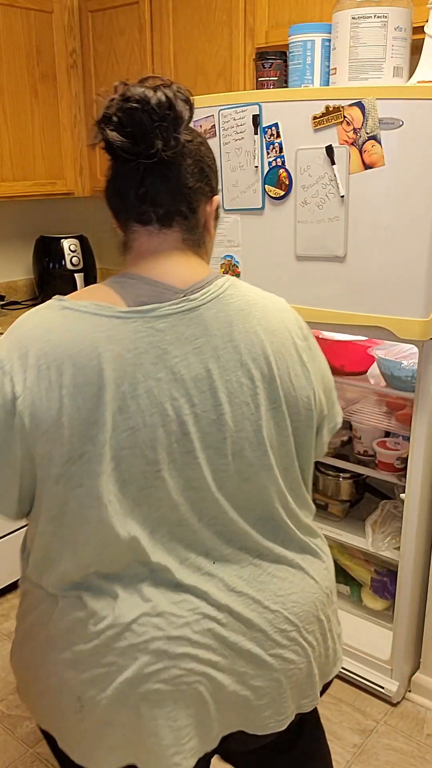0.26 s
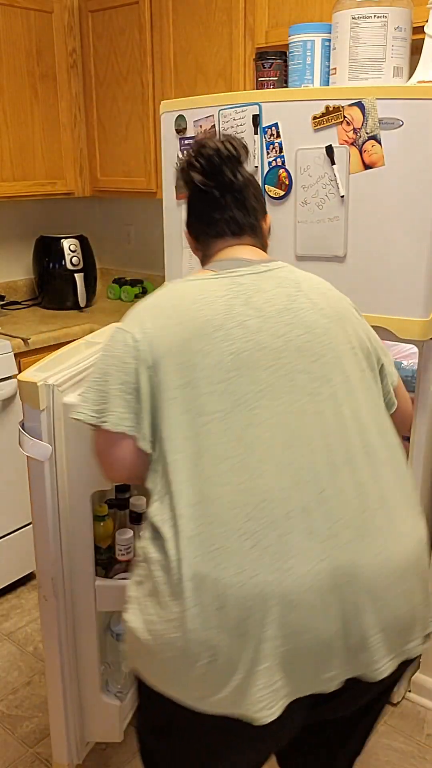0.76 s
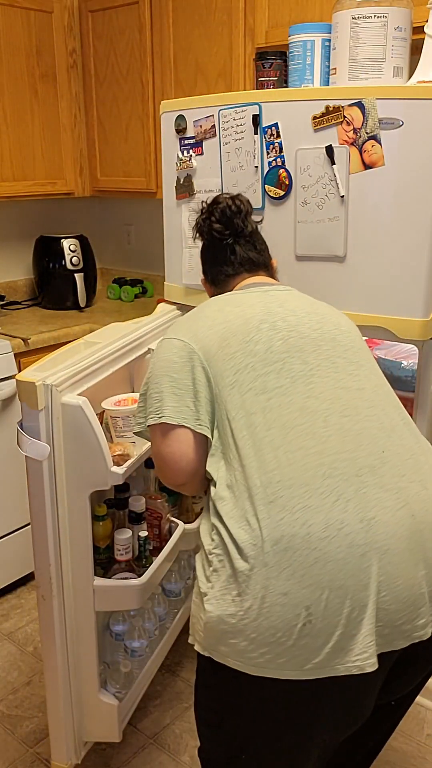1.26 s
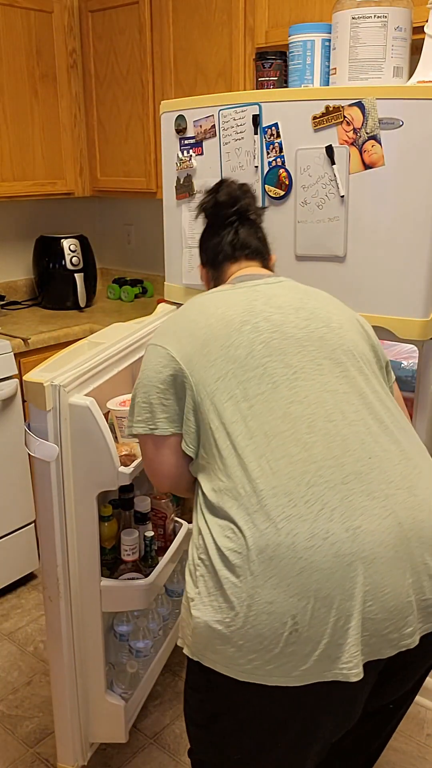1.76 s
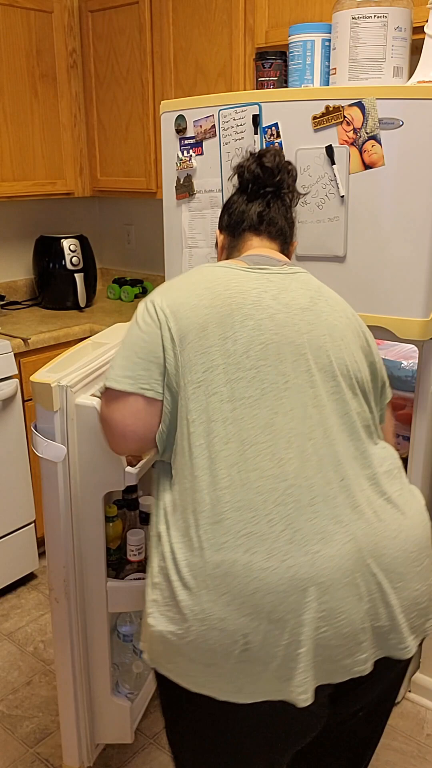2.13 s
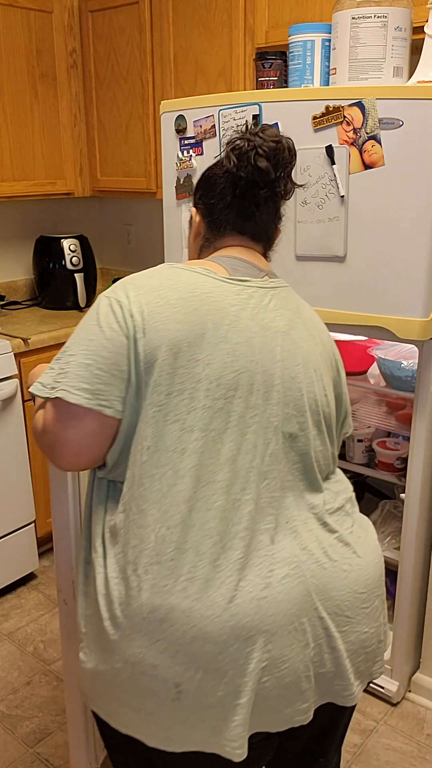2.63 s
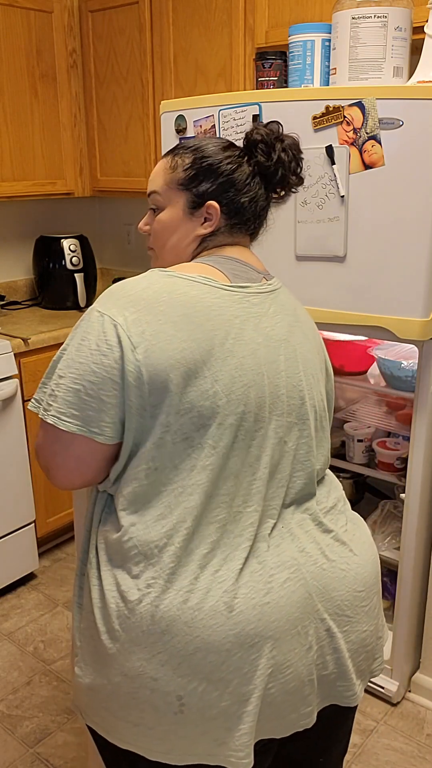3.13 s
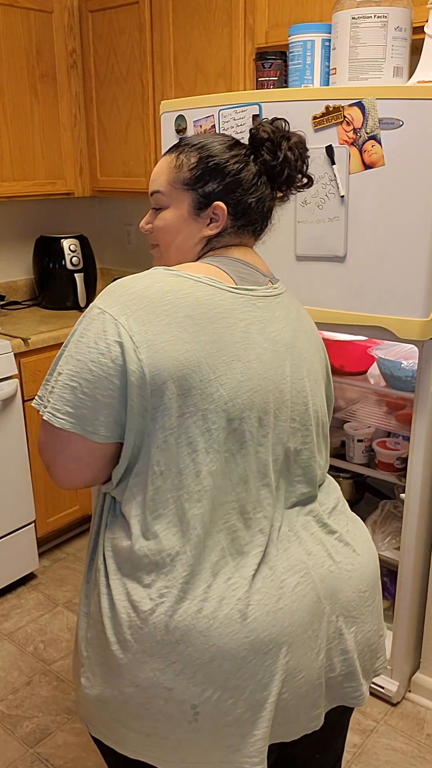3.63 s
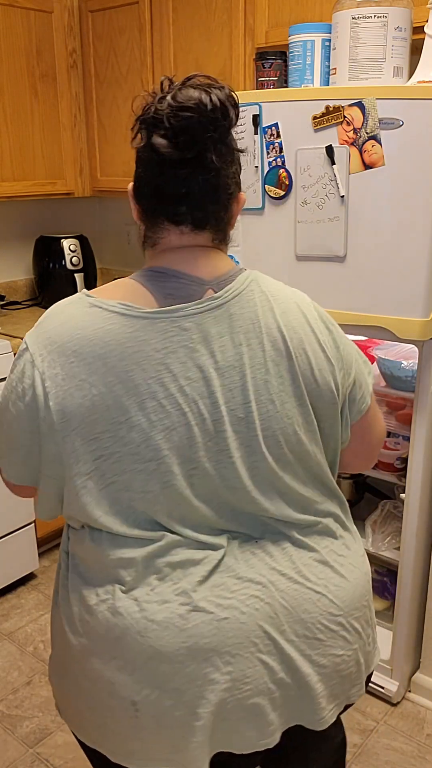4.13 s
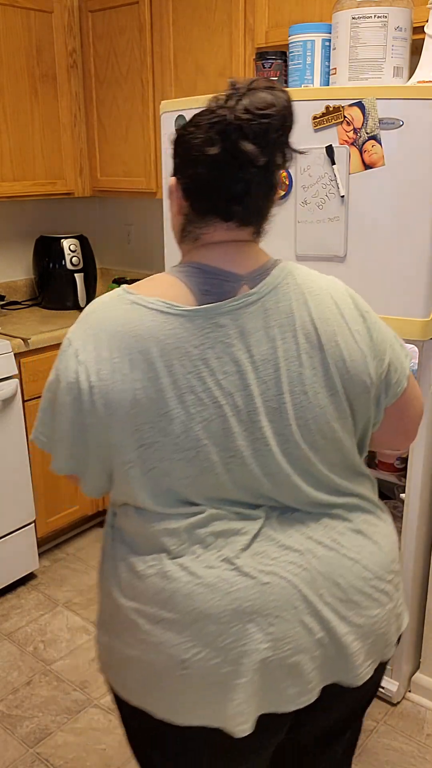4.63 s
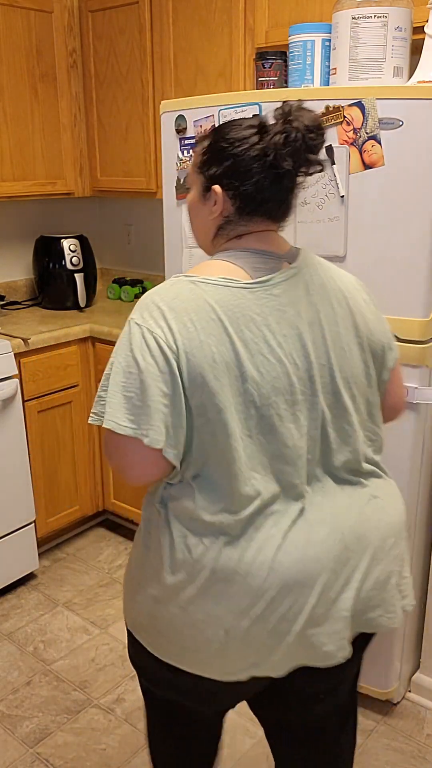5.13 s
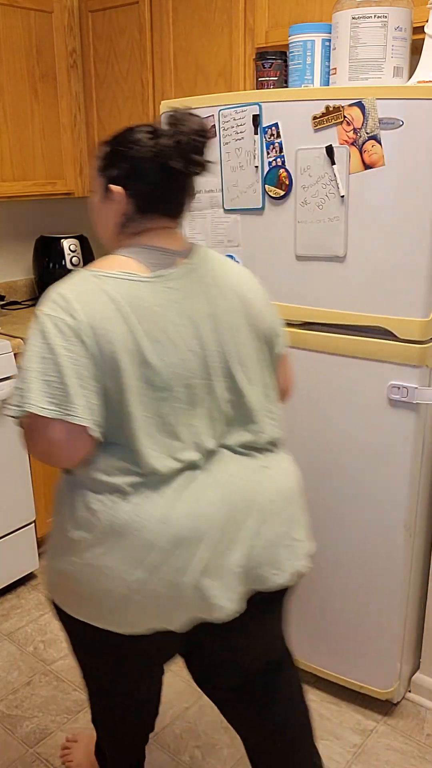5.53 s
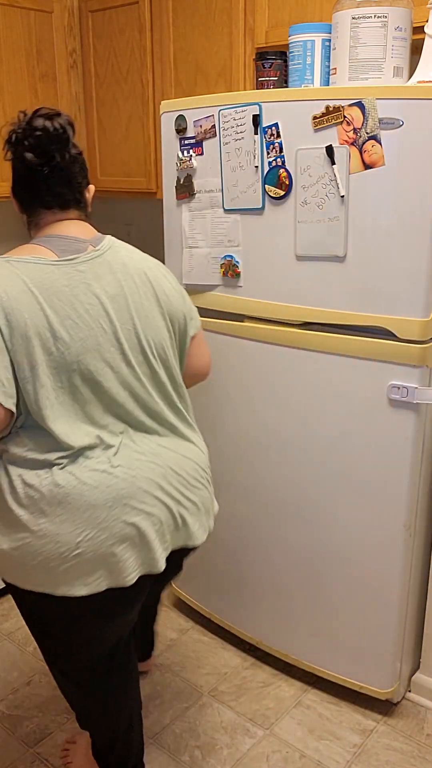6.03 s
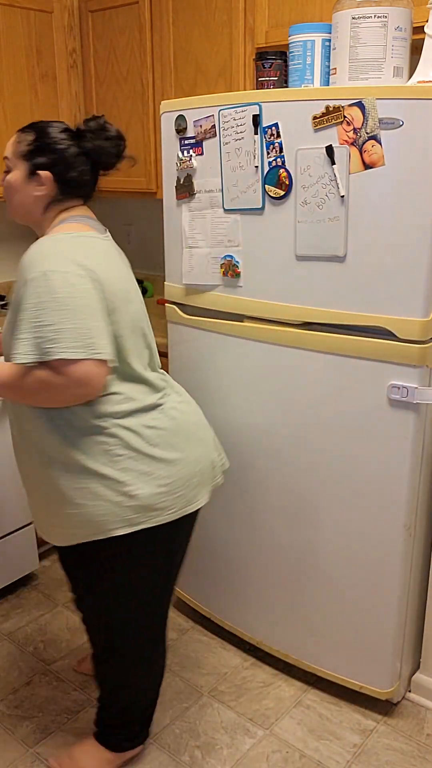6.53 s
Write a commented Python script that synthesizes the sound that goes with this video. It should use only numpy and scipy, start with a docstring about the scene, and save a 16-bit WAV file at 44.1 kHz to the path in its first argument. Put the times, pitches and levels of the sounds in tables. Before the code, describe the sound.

An open refrigerator hums in a hard-walled kitchen, heard from a few steps away. Clothes rustle faintly and feet shuffle. A tub drops into the door rack and jolts the bottles, then containers knock, scrape and clatter on a shelf, with a brief clink of a glass jar. The door shuts with a clack and a low thud, and the hum carries on more softly.

```python
"""An open refrigerator hums in a hard-walled kitchen, heard from a few steps away. Clothes rustle,
feet shuffle, plastic ticks and faint tones linger. After a second a tub drops into the door rack and
jolts the bottles. Next, containers knock, scrape and clatter on a shelf, and a glass jar clinks.
Just after five seconds the door swings shut with a clack and a thud, and the hum goes on more softly."""
import sys
import numpy as np
from scipy import signal
from scipy.fft import rfft, irfft, next_fast_len
from scipy.io import wavfile
from scipy.ndimage import map_coordinates

SR = 44100
rng = np.random.default_rng(int(sys.argv[2]) if len(sys.argv) > 2 else 0)


def generate_wav(signal):
    """Clip the signal to [-1, 1] and save it as 16-bit WAV at the path in sys.argv[1]."""
    frames = np.transpose(np.atleast_2d(signal))
    scaled = np.clip(frames, -1, 1) * 32767
    pcm = np.round(scaled).astype(np.int16)
    wavfile.write(sys.argv[1], SR, pcm)


N = 298777
TIME = np.arange(N) / SR
AGE = np.arange(SR) / SR  # seconds since a hit
HZ = np.fft.rfftfreq(SR, 1 / SR)
DOOR_SHUT_S = 5.2125
# Light touches of a hand on plastic: start_s, level_db
TOUCHES = [(0.1196, -48), (0.4193, -49.5), (1.097, -49.5), (4.0316, -45), (4.1554, -39), (5.035, -51),
           (5.4794, -41.5), (5.684, -43)]


def amp(db):
    """Turn decibels into a gain to multiply by."""
    return 10 ** (np.asarray(db) / 20)


def unit(x):
    """Scale a signal so its average level (rms) is 1."""
    return x / np.sqrt(np.mean(x ** 2) + 1e-20)


def along(points, hz):
    """Read between (pitch_hz, value) points, giving each octave about the same space."""
    pitches, values = np.transpose(points)
    return np.interp(np.log(hz + 1), np.log(pitches + 1), values)


def wobble(rate):
    """A smooth curve through `rate` random values a second."""
    return map_coordinates(rng.standard_normal(int(N * rate / SR) + 4), [TIME * rate])


def strokes(rows, attack_s, fall_db_per_s):
    """Loudness of (start_s, length_s, level_db) rubs: rise, hold, then fade."""
    return sum(np.clip((TIME - s) / attack_s, 0, 1)
               * amp(db - fall_db_per_s * np.maximum(TIME - s - length, 0)) for s, length, db in rows)


def swells(rows, rise_share=0.59):
    """Loudness of (peak_s, level_db, fade_s) movements that build up faster than they fade."""
    return sum(amp(db) * np.exp(-np.maximum((s - TIME) / rise_share, TIME - s) / fade)
               for s, db, fade in rows)


def filtered(x, response):
    """Turn each frequency up or down by the gain response(hz)."""
    n = x.shape[-1]
    padded = next_fast_len(n + 8192)
    return irfft(rfft(x, padded) * response(np.fft.rfftfreq(padded, 1 / SR)), padded)[..., :n]


def body(spectrum, modes):
    """An object's gain at each frequency: a broad shape with peaks where it likes to ring."""
    peaks = sum(db / (1 + (2 * (HZ - hz) / width) ** 2) for hz, width, db in modes)
    return amp(along(spectrum, HZ) + peaks)


def tap(gain):
    """The sound of one sharp tap on an object with this gain at each frequency."""
    cepstrum = irfft(np.log(np.maximum(gain, 1e-6)), SR)
    # Folding moves the energy to the start (minimum phase).
    cepstrum[1:SR // 2] *= 2
    cepstrum[SR // 2 + 1:] = 0
    return irfft(np.exp(rfft(cepstrum)), SR)


def add(track, start_s, sound):
    """Mix a stereo sound into the track."""
    start = max(round(start_s * SR), 0)
    track[:, start:start + sound.shape[1]] += sound[:, :N - start]


def diffuse(n, spacing_m=.17):
    """Noise from all sides at two microphones: alike in the bass, unrelated in the treble."""
    def shares(hz):
        alike = .985 * np.sinc(2 * hz * spacing_m / 343)
        return np.sqrt([(1 + alike) / 2, (1 - alike) / 2])
    mid, side = filtered(rng.standard_normal((2, n)), shares)
    return np.array([mid + side, mid - side])


def rush(spectrum):
    """Steady noise from all sides with the given tone colour."""
    return unit(filtered(diffuse(N), lambda hz: amp(along(spectrum, hz))))


def in_kitchen(sound, direct_db, chatter_s=.001, first_share=.18):
    """A contact chatters, and arrives directly, off near cabinets and as a long echo."""
    # Time the echo takes to fall 60 dB: pitch_hz, ring_s
    echo_times = [(60, .68), (200, .7), (600, .64), (2000, .63), (5000, .62), (9000, .57), (15000, .52)]
    hz, t, noise = signal.stft(diffuse(SR), SR, nperseg=256)
    cabinets = np.hypot(1, amp(1 - 60 * t / .23))
    fade = amp(-60 * t / along(echo_times, hz)[:, None]) * cabinets
    echo = signal.istft(noise * fade, SR, nperseg=256)[1][:, :SR] / 2
    # A dying chatter follows the first touch; the room fills as that energy arrives.
    power = amp(-60 * AGE / chatter_s) ** 2
    power *= (1 - first_share) / power.sum()
    force = np.sqrt(power) * rng.standard_normal(SR)
    force[0] += np.sqrt(first_share)
    echo *= np.sqrt(first_share + np.cumsum(power))
    # The refrigerator stands to the right, so the left side hears it later.
    direct = np.array([np.roll(force, 10), force]) * amp(direct_db) / 2
    return signal.fftconvolve(sound[None], echo + direct, axes=1)[:, :len(sound)]


def blows(hits, gain, clack_db, chatter_s, direct_db):
    """Hits on one object: heavy ones thump, hard ones are bright, strong ones rattle longer."""
    # The thump, middle, clack and treble ranges: low_hz, high_hz
    bands = [(30, 300), (300, 1200), (1200, 4000), (4000, 16000)]
    track = np.zeros((2, N))
    share = np.array([np.sqrt(np.mean(gain ** 2 * (HZ > lo) * (HZ < hi))) for lo, hi in bands])
    centres = np.sqrt(np.prod(bands, axis=1))
    octaves = np.maximum(np.log2(centres / centres[1]), 0)
    for s, db, thump_db, slope in hits:
        drive_db = db + slope * octaves + np.array([thump_db, 0, clack_db, 0]) - 20 * np.log10(share)
        ring = tap(gain * amp(along(np.c_[centres, drive_db], HZ)))
        add(track, s, in_kitchen(ring, direct_db, chatter_s + .15 * amp(db)))
    return track


def rubbing(loudness, gain, slips_per_s, spread_db=3.5):
    """Friction: a stream of small random slips, each one tapping the object."""
    slipping = rng.random(N) < slips_per_s / SR
    slips = slipping * amp(spread_db * rng.standard_normal(N)) * rng.choice([-1, 1], N)
    sound = unit(signal.fftconvolve(slips, tap(gain))[:N]) * loudness
    return unit(in_kitchen(sound, direct_db=30.5)) * np.sqrt(np.mean(sound ** 2))


def compressor_and_fan():
    """The compressor hums, softer once the door is shut, while the fan and room air rush on."""
    # The compressor's tones: pitch_hz, level_db
    tones = [(59.2, 3), (118.4, -6), (166.9, -15), (409, -19.5)]
    # The hum swells as the door swings: peak_s, level_db, fade_s
    hum_swell = [(4.93, -58, 0.15)]
    # Tone colour of the moving air: pitch_hz, level_db
    air = [(20, -41), (40, -18), (62, -9), (90, -12.5), (115, -8), (230, -12), (330, -15.5), (430, -16),
           (950, -26), (1300, -32), (2500, -47.5), (4000, -50.5), (8000, -43.5), (16000, -56)]
    hum = sum(amp(db + .93 * wobble(8.5)) * np.sin(2 * np.pi * (hz * TIME + rng.random()))
              for hz, db in tones)
    shut = np.clip((TIME - DOOR_SHUT_S) / .1, 0, 1)
    loudness = amp(-56 - 4.5 * shut) + swells(hum_swell)
    return unit(hum) * loudness + rush(air) * amp(-57.5 + .7 * wobble(6))


def lingering_tones():
    """Faint, fuzzy tones hang in the air and die away."""
    # The tones: start_s, pitch_hz, level_db, ring_s
    tones = [(0, 325.5, -49, 2.5), (.13, 4950, -71, 1), (.5, 5090, -73, 1), (.66, 4030, -76.5, 0.98)]
    track = np.zeros((2, N))
    for s, hz, db, ring_s in tones:
        loudness = (1 - np.exp(-TIME / .0085)) * amp(db - 60 * TIME / ring_s)
        waver = 1.7 * np.array([wobble(.045 * hz), wobble(.045 * hz)])  # blurs the pitch
        add(track, s, loudness * np.sin(2 * np.pi * hz * TIME + waver))
    return track


def clothes():
    """Cloth rubs as the body moves, and the hand brushes on after each touch."""
    # Arm and body movements: peak_s, level_db, fade_s
    movements = [(0.01, -62, 0.099), (1.04, -66, 0.38), (1.97, -82, .08), (4.31, -63.5, .07),
                 (4.89, -61, .05), (4.98, -61.5, .08), (5.89, -65, 0.063), (6.1, -67.5, 0.049),
                 (6.32, -69.5, 0.055), (6.52, -60.5, 0.069)]
    # Tone colour of cloth: pitch_hz, level_db
    cloth = [(900, -25), (1800, -7), (3000, -5), (5000, -1), (8000, -2), (11000, -9), (16000, -11)]
    brushes = strokes([(s, .016, db - 15) for s, db in TOUCHES], attack_s=.005, fall_db_per_s=179)
    return rubbing(swells(movements) + brushes, amp(along(cloth, HZ)), slips_per_s=1000)


def feet():
    """Bare soles shuffle dully on the floor."""
    # Shifts of the feet: peak_s, level_db, fade_s
    shuffles = [(0.05, -55.5, 0.68), (1.05, -58.5, 0.12), (1.8, -62.5, 0.33), (4.1, -55.5, 0.23),
                (5.15, -55, 0.16), (5.68, -57.5, 0.19), (6.45, -64, 0.18)]
    # Tone colour of the soles: pitch_hz, level_db
    soles = [(30, -22), (120, -3), (250, -1.5), (450, -2.5), (950, -11), (1500, -20), (3000, -38.5),
             (16000, -69.5)]
    return rush(soles) * swells(shuffles)


def plastic_ticks():
    """Plastic ticks lightly as it is handled."""
    # Tone colour of a tick: pitch_hz, level_db
    colour = [(700, -9), (1500, 5.5), (3000, -2.5), (5000, -4), (8000, 1), (11000, -9), (16000, -10.5)]
    tick = tap(unit(amp(along(colour, HZ))))
    track = np.zeros((2, N))
    for s, db in TOUCHES:
        add(track, s, amp(db - 7.5) * in_kitchen(tick, direct_db=26, chatter_s=.03))
    return track


def door_rack():
    """A tub is fumbled into the plastic rack and snaps down, jolting the bottles."""
    # The tub hits the rack: start_s, level_db, thump_db, treble_db_per_octave
    hits = [(1.139, -31.5, -7, -2.5), (1.157, -23, -2.5, -3.5), (1.213, -25.5, -17, -5),
            (1.244, -37.5, 6, -4), (1.364, -23.5, -17.5, -0.04)]
    # Tone colour of the rack: pitch_hz, level_db
    colour = [(25, -37.5), (45, -15.5), (100, 5), (200, -3.5), (450, -1), (790, -4.5), (930, -10),
              (1500, -10), (3000, -16.5), (4600, -19), (8000, -27), (10500, -33.5), (16000, -41)]
    # Where the rack rings: pitch_hz, width_hz, boost_db
    modes = [(109, 16, 2.5), (304.4, 22, 6), (425, 45, 1), (576, 11, 6.5), (639, 14, 7), (783, 23, 6),
             (1090, 61, 6.5), (2035, 33, 4)]
    # Where the bottles ring: pitch_hz, width_hz, level_db
    bottles = [(3290, 60, -5), (3700, 420, 0), (5660, 80, -10), (8100, 400, -7)]
    track = blows(hits, body(colour, modes), clack_db=.5, chatter_s=.016, direct_db=15)
    glass = unit(sum(amp(db) / (1 + (2 * (HZ - hz) / width) ** 2) for hz, width, db in bottles))
    snap_s = hits[-1][0]
    add(track, snap_s, amp(-25.5) * in_kitchen(tap(glass), direct_db=18, chatter_s=.08))
    return track


def shelf():
    """Containers land on the shelf, slide along it and clatter together."""
    # Containers knock: start_s, level_db, thump_db, treble_db_per_octave
    hits = [(2.358, -17, -8, -4.7), (2.368, -12, -9, -5.7), (2.477, -18.5, -10, -8.5),
            (2.539, -21, -15, -8), (2.644, -34.5, 4.5, -3), (2.688, -25, -14.5, -3.5), (2.912, -32, 1, 0),
            (3.041, -46.5, -2, 1.4), (3.113, -38, -9.5, 0.95), (3.268, -19.5, -23, -1.06),
            (3.346, -21.5, 2, 1.16), (3.359, -8.5, -10, -4), (3.375, -10.5, -15, -3.5),
            (3.394, -11.5, -11, -5), (3.659, -24.5, -7, -5), (3.691, -27.5, -5, -7.5),
            (3.814, -35, -6, -6.5)]
    # Tone colour of the shelf: pitch_hz, level_db
    colour = [(18, -50.5), (30, -15.5), (194, -1), (252, -8), (415, 1.5), (554, -4.5), (721, -2.5),
              (801, -6.5), (1500, -12.5), (1630, -17), (3980, -25), (5900, -30), (6720, -29), (9970, -39),
              (16000, -41.5)]
    # Where the shelf rings: pitch_hz, width_hz, boost_db
    modes = [(206, 8.2, 6), (410, 7.2, 4), (455.4, 8, 4.4), (686, 28, 4.2), (900, 11, 2.5), (987.5, 21, 4),
             (1097, 27, 2.3), (1700, 150, 3.2), (4020, 190, 3.4)]
    # A container slides: start_s, length_s, level_db
    shoves = [(2.42, 0.18, -30.5), (2.685, 0.032, -26), (2.81, .11, -32.5)]
    # It catches and judders: start_s, length_s, level_db
    judders = [(2.795, 0.033, -23), (2.885, .025, -25.5)]
    gain = body(colour, modes)
    knocks = blows(hits, gain, clack_db=3, chatter_s=.04, direct_db=18)
    scrape = rubbing(strokes(shoves, attack_s=.011, fall_db_per_s=114.5), gain, slips_per_s=300)
    boom = 1 / (1 + ((HZ - 200) / 70) ** 2)  # the shelf booms as it bends
    catching = strokes(judders, attack_s=.028, fall_db_per_s=800.5)
    return knocks + amp(-2) * scrape + rubbing(catching, boom, slips_per_s=490, spread_db=4.5)


def jar():
    """A glass jar clinks briefly, damped by its contents."""
    # One hard and one soft contact: start_s, level_db, treble_db_per_octave
    clinks = [(3.348, -29, 4), (3.405, -39, -9)]
    # The jar's tones: pitch_hz, level_db, ring_s
    tones = [(2643, -7, .1), (3929, -9, .15), (4039, -8, .2), (6620, 0, .07), (9147, -4, .08),
             (10450, -14, .05)]
    lowest_hz = tones[0][0]
    track = np.zeros((2, N))
    for s, db, slope in clinks:
        ring = np.zeros(SR)
        for hz, tone_db, ring_s in tones:
            struck_db = tone_db + slope * np.log2(hz / lowest_hz) + rng.normal(0, 1.5)
            ring += amp(struck_db - 60 * AGE / ring_s) * np.sin(2 * np.pi * hz * AGE)
        add(track, s, amp(db) * in_kitchen(ring / np.linalg.norm(ring), direct_db=44))
    return track


def door():
    """The hinge rubs, the edge clacks, then the door thuds on its soft seal and the racks shake."""
    # Tone colour of the door: pitch_hz, level_db
    colour = [(12, -32), (22, -6), (60, -10.5), (100, -3.5), (150, -7.5), (270, -14), (400, -12.5),
              (620, -15), (1030, -17.5), (1250, -18.5), (1750, -20), (2200, -24.5), (8000, -36),
              (11500, -49), (16000, -51)]
    # Where the door rings: pitch_hz, width_hz, boost_db
    modes = [(46, 12, 2.3), (73, 14, 3.9), (114, 35, 3), (171, 20, 6.6), (372, 17, 1.2), (504, 18, 3),
             (620, 48, 5.3), (1033, 77, 4.1), (1703, 120, 5.3)]
    # The hinge rubs: start_s, length_s, level_db
    rubs = [(4.87, .06, -58.5), (5.035, 0.054, -50)]
    # The hard edge touches first: start_s, level_db, thump_db, treble_db_per_octave
    edge_hits = [(5.1705, -31, -19, -3), (5.194, -42, -13, -6)]
    # The door bounces on its seal: pitch_hz, level_db, ring_s
    bounce = [(46.2, -39, 0.12), (116.4, -19, 0.28), (151, -9.5, 0.076)]
    # The door lands and its racks shake: start_s, level_db, thump_db, treble_db_per_octave
    landing_hits = [(5.2125, -29, 0.5, 1.87), (5.2215, -21, 0, -2), (5.256, -26, -.5, -4),
                    (5.278, -34, 10, -0.4)]
    gain = body(colour, modes)
    swing = strokes(rubs, attack_s=.015, fall_db_per_s=100)
    bass_cut = HZ / (HZ + 200)
    track = rubbing(swing, gain * bass_cut, slips_per_s=980)
    thud = sum(amp(db - 60 * AGE / ring_s) * np.sin(2 * np.pi * hz * AGE) for hz, db, ring_s in bounce)
    add(track, DOOR_SHUT_S, np.array([thud, thud]) * (1 - np.exp(-AGE / .0015)))
    edge = blows(edge_hits, gain, clack_db=17.5, chatter_s=.029, direct_db=28.5)
    landing = blows(landing_hits, gain, clack_db=-.6, chatter_s=.011, direct_db=29)
    return track + edge + landing


def scene():
    """Everything that sounds in the kitchen."""
    putting_away = door_rack() + shelf() + jar() + door()
    person = clothes() + plastic_ticks() + feet()
    return putting_away + person + lingering_tones() + compressor_and_fan()


def record(dry):
    """The right microphone is a little brighter; peaks are rounded off and the highest treble is cut."""
    left_db = lambda hz: along([(2500, .33), (6000, -.4), (9500, -2.8), (14000, -.44)], hz)
    tilted = filtered(dry, lambda hz: amp([left_db(hz), -left_db(hz)]))
    rounded = tilted / (1 + np.abs(tilted / .95) ** 6) ** (1 / 6)
    return filtered(rounded, lambda hz: np.clip((16100 - hz) / 400 + .5, 0, 1))


dry = scene()
out = record(dry)
generate_wav(out)
```